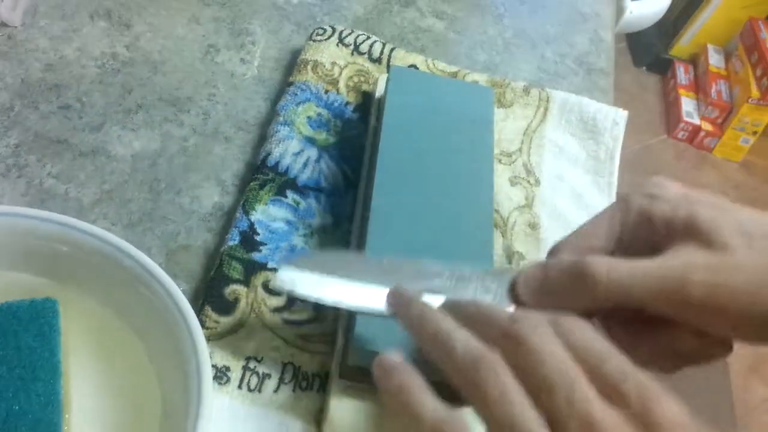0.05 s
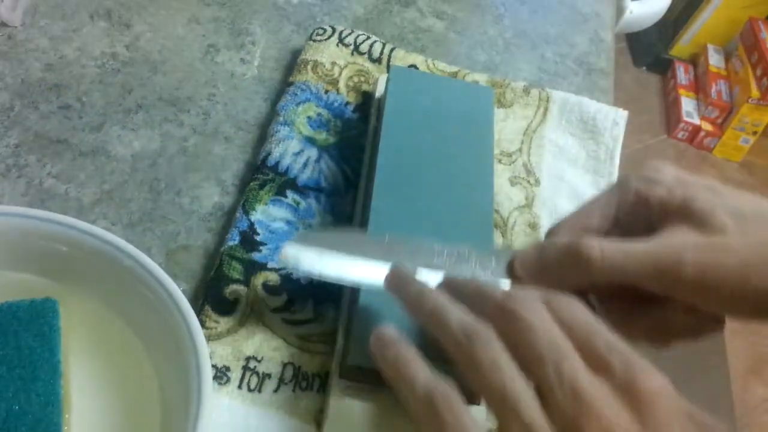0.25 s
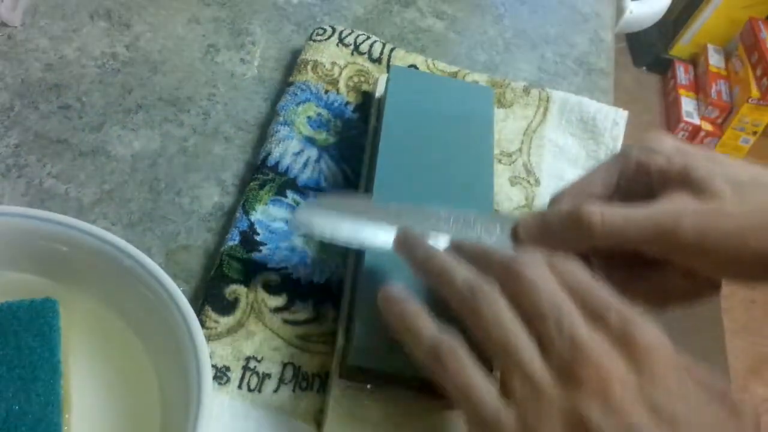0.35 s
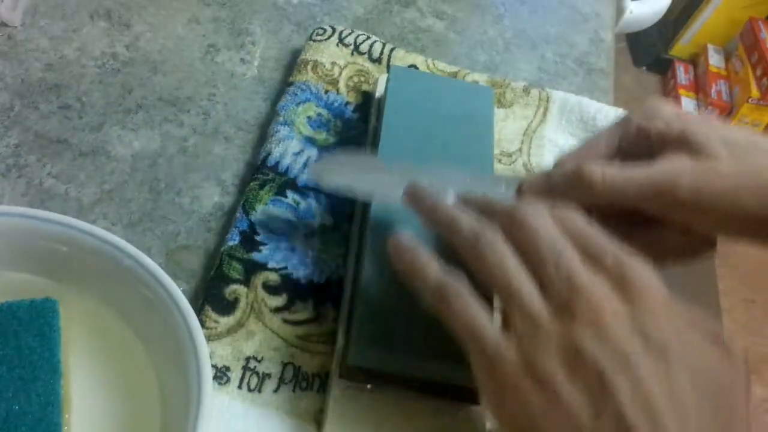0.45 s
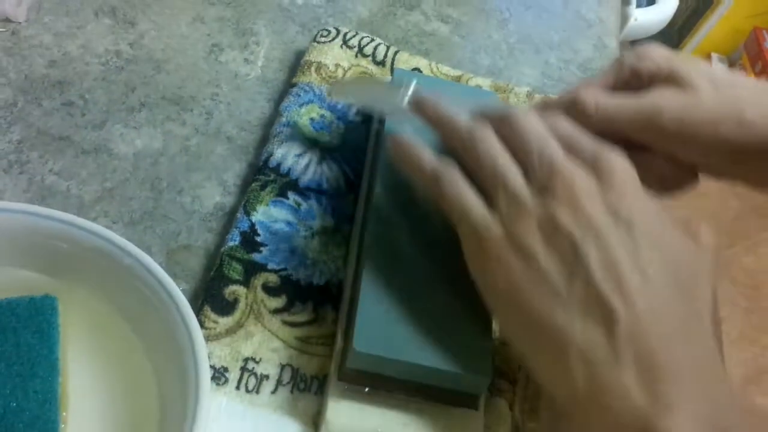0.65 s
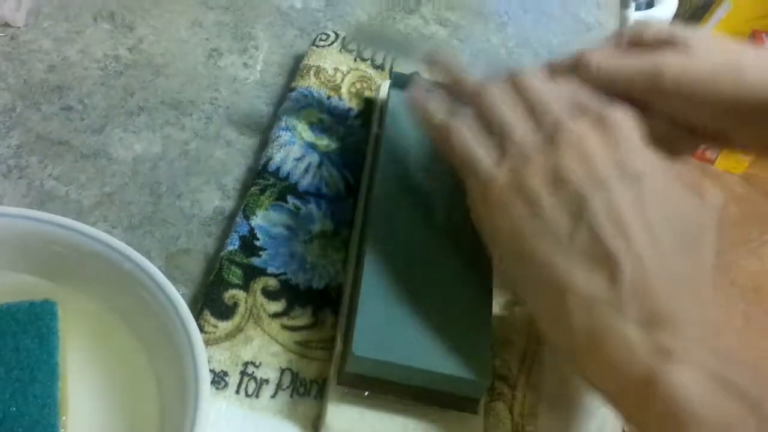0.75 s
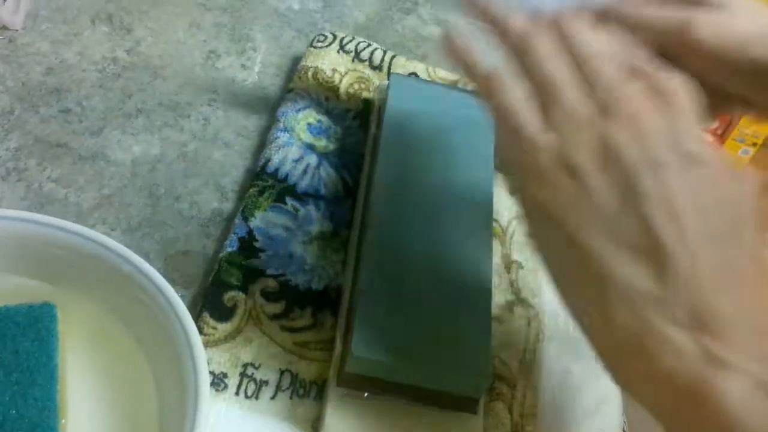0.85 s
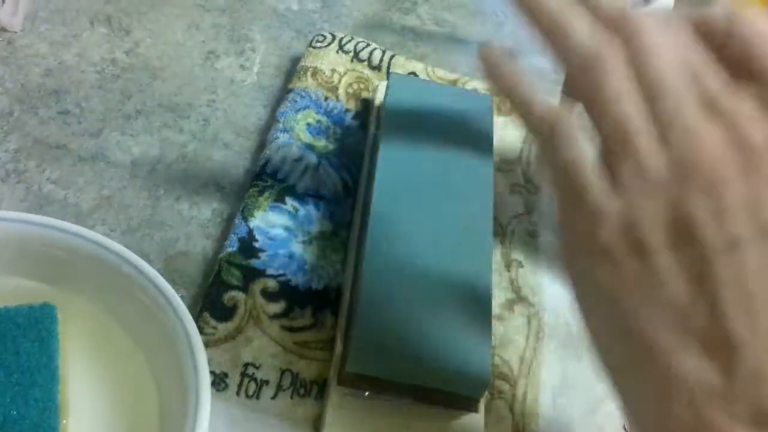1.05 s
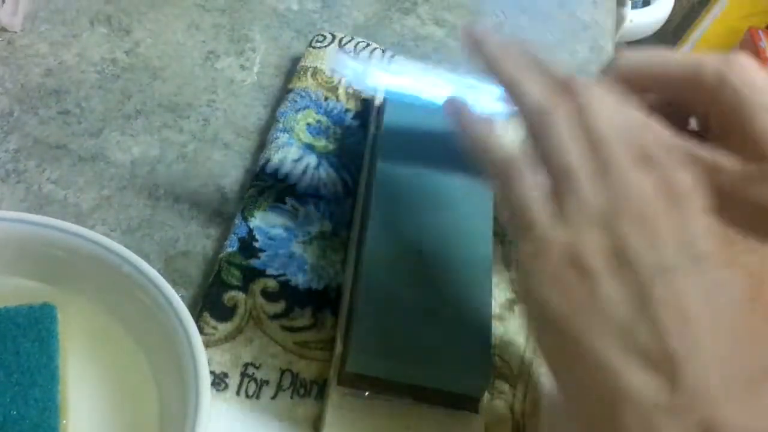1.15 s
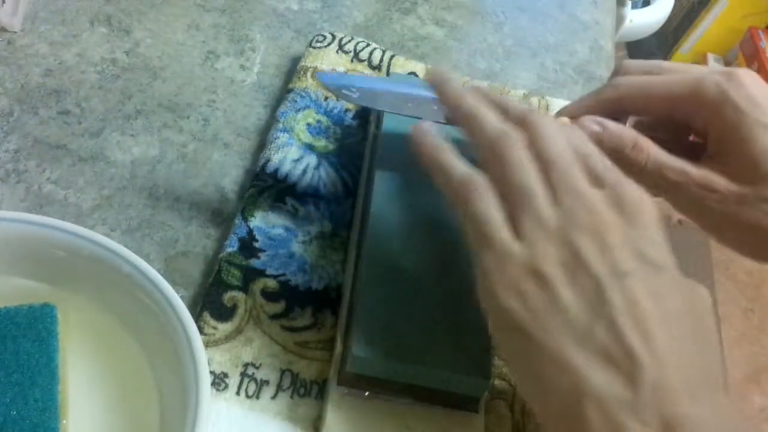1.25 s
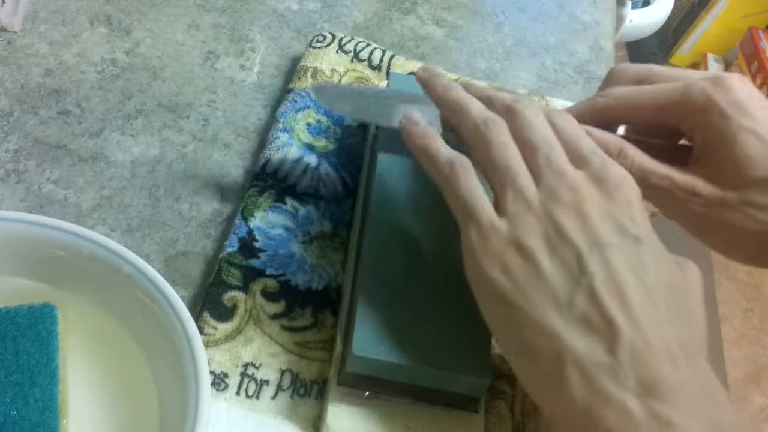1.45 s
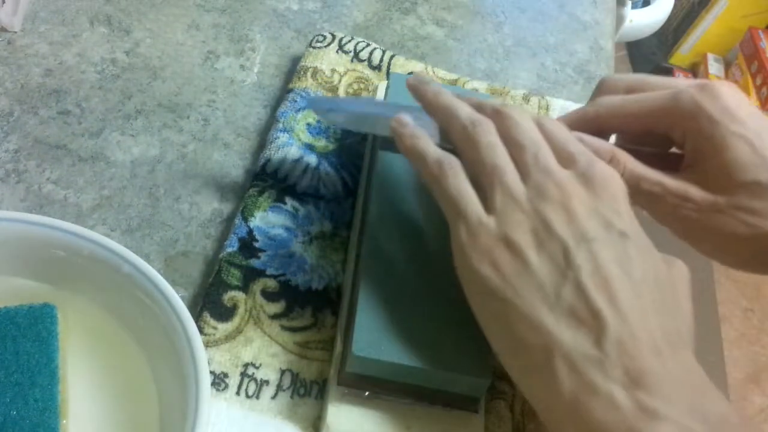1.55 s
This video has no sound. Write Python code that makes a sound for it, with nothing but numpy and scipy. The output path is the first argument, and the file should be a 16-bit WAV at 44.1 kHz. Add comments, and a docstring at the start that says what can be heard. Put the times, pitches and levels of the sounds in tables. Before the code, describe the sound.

A knife blade scrapes once across a coarse wet whetstone, close up in a quiet room

```python
"""A kitchen knife is drawn once across a coarse wet whetstone in a small quiet room, close to a two-port microphone.
Random grit catches, about 1900 a second over smooth slurry noise, excite resonances of blade and stone.
Coarse grains add single impulses, and decaying modes sound two knocks as the blade slips off the far edge.
The pushing hands set the counter rumbling (resonant noise); wavering sines make an appliance hum over a soft
room rumble of shaped noise. Decaying noise makes the near echoes and the room's reverberation."""
import sys
import numpy as np
from scipy import signal
from scipy.fft import rfft, irfft, next_fast_len
from scipy.io import wavfile
from scipy.ndimage import map_coordinates

SR = 44100
rng = np.random.default_rng(int(sys.argv[2]) if len(sys.argv) > 2 else 0)


def master(y):
    """Save y as 16-bit WAV."""
    cut = np.clip(np.atleast_2d(y).T, -1, 1)
    pcm = np.round(cut * 32767)  # scale
    wavfile.write(sys.argv[1], SR, pcm.astype(np.int16))


N = 70560  # samples


def amp(db):
    """Level to amplitude: 20 dB is a factor of ten."""
    return 10 ** (np.asarray(db) / 20)


def unit(x):
    """Normalise the mean-square power to 1."""
    return x / np.sqrt(np.mean(x ** 2) + 1e-20)


def along(points, hz):
    """Interpolate (f/Hz, value) points on a logarithmic frequency axis."""
    f, value = np.transpose(points)
    return np.interp(np.log(hz + 1), np.log(f + 1), value)


def wobble(rate):
    """Slow random fluctuation: a spline through normal random knots, rate of them a second."""
    knots = rng.standard_normal(int(N * rate / SR) + 4)
    return map_coordinates(knots, [np.arange(N) * rate / SR])


def filtered(x, response):
    """Linear filtering: multiply the spectrum by a complex response of frequency."""
    m = next_fast_len(N + SR // 2)
    spectrum = rfft(x, m) * response(np.fft.rfftfreq(m, 1 / SR))
    return irfft(spectrum, m)[..., :N]


def unit_power(h):
    """Normalise a frequency response to mean power 1."""
    return h / np.sqrt(np.mean(np.abs(h) ** 2))


def resonances(peaks):
    """Minimum-phase resonance: the folded cepstrum of the summed mode powers gives a causal response."""
    def response(f):
        power = 0
        for centre, width, db in peaks:
            resonator = f * width / (centre * centre - f * f + 1j * f * width)
            power = power + amp(db) ** 2 * np.abs(resonator) ** 4  # two stages: steep skirts
        cepstrum = irfft(np.log(power + 1e-12) / 2)
        half = len(cepstrum) // 2
        folded = np.concatenate([cepstrum[:1], 2 * cepstrum[1:half], np.zeros(len(cepstrum) - half)])
        return unit_power(np.exp(rfft(folded)))
    return response


def echoes(x, t60, seconds, part_s):
    """Diffuse reverberation: convolve cross-faded parts with fresh stereo noise, decaying at t60 by frequency."""
    step = round(part_s * SR)
    x = np.pad(x, (step, 2 * step))
    out = np.zeros((2, 2 * N))
    fade = np.sin(np.pi * np.arange(2 * step) / (2 * step)) ** 2
    for start in range(0, N + step, step):
        noise = rng.standard_normal((2, round(seconds * SR)))
        hz, t, bands = signal.stft(noise, SR, nperseg=128)
        decay = amp(-60 * t / along(t60, hz)[:, None])
        tail = signal.istft(bands * decay, SR, nperseg=128)[1]
        tail = tail / np.linalg.norm(tail, axis=1, keepdims=True)
        part = fade * x[start:start + 2 * step]
        wet = signal.fftconvolve(part[None], tail, axes=1)
        out[:, start:start + wet.shape[1]] += wet
    return out[:, step:step + N]


def room_rumble():
    """Partly coherent noise field: mid and side shares set the left-right correlation by frequency."""
    # rumble spectrum: f/Hz, relative power density/dB per Hz
    spectrum = [(20, -8.5), (60, -8), (120, -10.5), (180, -16.5), (240, -19), (350, -19.5), (700, -22),
                (1500, -32), (3000, -40.5), (6000, -45.5), (12400, -51), (13400, -71.5), (16000, -75.5)]
    # left-right likeness: f/Hz, correlation (1 is identical)
    likeness = [(60, 0.47), (240, 0.39), (950, 0.089), (3770, 0.07), (15000, 0.04)]

    def mid_side(hz):
        angle = np.arccos(np.clip(along(likeness, hz), -1, 1)) / 2
        return amp(along(spectrum, hz)) * [np.cos(angle), np.sin(angle)]

    mid, side = filtered(rng.standard_normal((2, N)), mid_side)
    return amp(-58) * unit(np.array([mid + side, mid - side]))


def appliance_hum():
    """Modulated sinusoids: random level and phase unsteadiness, with level and phase differences between ports."""
    # hum lines: f/Hz, rms level before wavering/dB, left over right/dB, left leads/rad
    lines = [(61.3, -67, -10.5, 1.3), (86.5, -60.5, 0.5, .7)]
    waver_db, drift_rad = 5.5, 0.2  # scale of the level and phase unsteadiness
    t = np.arange(N) / SR
    out = np.zeros((2, N))
    for hz, db, pan_db, lead in lines:
        start_phase = rng.uniform(0, 2 * np.pi)
        phase = 2 * np.pi * hz * t + drift_rad * wobble(5.3) + start_phase
        tone = np.sin(phase + np.array([[lead], [0]]))
        level = np.sqrt(2) * amp(db + waver_db * wobble(4.7))
        out += level * tone * amp([[pan_db / 2], [-pan_db / 2]])
    return out


def grit():
    """Stick-slip friction as random impulses over smooth rubbing, under uneven pressure; rms 1."""
    catches_per_s, spread_db = 1900, 3  # spread: mean of the exponential scatter in catch level
    slurry_db = -2  # smooth rubbing relative to the catches
    chatter_db, chatter_per_s = 0.5, 220  # fast unevenness
    sway_db, sway_per_s = -0.5, 30  # slow unevenness
    caught = rng.random(N) < catches_per_s / SR
    size = amp(spread_db * rng.exponential(size=N))
    catches = caught * size * rng.choice([-1, 1], N)
    rub = unit(catches) + amp(slurry_db) * rng.standard_normal(N)
    pressure_db = chatter_db * wobble(chatter_per_s) + sway_db * wobble(sway_per_s)
    return unit(rub * amp(pressure_db))


def scrape():
    """Source-filter excitation: grit noise and coarse-grain impulses drive the modes of stone and blade."""
    # course of the stroke: t/s, scrape level/dB, lowest blade ring over it/dB, treble over it/dB
    stroke = [(0.155, -58, -19, -6), (0.165, -45, -15, -3.5), (0.179, -39.5, -8, -6),
              (0.191, -51.5, -5, -0.5), (0.199, -40.5, -10, -1.5), (0.235, -30, -0.5, -6),
              (0.303, -27, -4.5, -5), (0.309, -25.5, 0.5, -5.5), (0.347, -30, -7, -5.5),
              (0.509, -32.5, -0.5, -4), (0.545, -29, -8, -3.5), (0.671, -40, 3.5, 3),
              (0.689, -33.5, -3.5, 0.5), (0.733, -35.5, -8, 3), (0.749, -42, -10, 6.5)]
    # how hard the scrape rings the stone's body: t/s, level/dB
    stone_level = [(0.16, -94), (0.166, -59), (0.228, -44), (0.242, -44.5), (0.278, -36), (0.29, -42.5),
                   (0.324, -34), (0.364, -51.5), (0.394, -42.5), (0.428, -51.5), (0.456, -46), (0.476, -51),
                   (0.554, -43), (0.688, -49), (0.708, -38.5), (0.722, -48.5), (0.736, -31), (0.745, -42)]
    # coarse grains: t/s, level before the drive gain/dB, lowest blade ring over the snag/dB
    snags = [(0.167, -35, 0.5), (0.176, -30, 2.5), (0.1984, -22.5, -4.5), (0.2164, -27, -4),
             (0.2524, -19.5, -5.5), (0.3039, -14.5, -10.5), (0.3115, -17.5, -8.5), (0.3144, -26, -5.5),
             (0.3226, -17.5, -9.5), (0.3467, -19, -4.5), (0.3532, -16.5, 1), (0.3894, -14.5, -2),
             (0.4018, -18, -2.5), (0.4094, -20.5, -10.5), (0.4464, -21, -4.5), (0.4533, -18, -7),
             (0.4734, -17, 0.5), (0.5, -18, -9), (0.5529, -26, -7), (0.5618, -20.5, -4.5), (0.7053, -20, 1),
             (0.7328, -27, 7)]
    # resonances, each: f/Hz, width of one resonator stage/Hz, relative level/dB
    stone_modes = [(800, 400, -23), (1280, 260, -6), (1480, 220, 0), (1900, 600, -15), (2750, 600, -15)]
    low_blade_modes = [(3740, 230, 0), (4000, 300, 0)]
    blade_modes = [(4710, 1100, -1.5), (4807, 330, -6.5), (5200, 1200, 2), (5560, 430, 3.5),
                   (5920, 160, 1.5)]
    treble_modes = [(7275, 1200, -5.5), (8130, 900, -8), (9270, 1000, -3), (10775, 2400, -1.5),
                    (11800, 1200, -9.5), (13900, 7100, -15)]
    touch_s, leave_s = 0.0032, 0.0041  # linear fade at first contact, decay constant at lift-off
    snag_drive_db = 11.5
    snag_stone_db, snag_treble_db = -16.5, -16.5  # shares of a snag

    t = np.arange(N) / SR
    s, *columns = np.transpose(stroke)
    level_db, low_db, treble_db = [np.interp(t, s, column) for column in columns]
    stone_db = np.interp(t, *np.transpose(stone_level)) - level_db  # relative to the scrape
    touch = np.clip((t - s[0]) / touch_s, 0, 1)
    lift_off = np.exp(-np.maximum(t - s[-1], 0) / leave_s)
    drive = grit() * touch * lift_off * amp(level_db)

    snag_s, snag_db, snag_low_db = np.transpose(snags)
    snag_at = np.round(snag_s * SR).astype(int)
    parts = [(stone_modes, stone_db, snag_stone_db), (low_blade_modes, low_db, snag_low_db),
             (blade_modes, 0, 0), (treble_modes, treble_db, snag_treble_db)]
    out = np.zeros(N)
    for modes, rub_db, share_db in parts:
        impulses = np.bincount(snag_at, amp(snag_db + snag_drive_db + share_db), N)
        out += filtered(drive * amp(rub_db) + impulses, resonances(modes))
    return out


def counter_rumble():
    """Forced resonance: noise from the pushing hands excites the counter under the stone."""
    # push of the hands: t/s, level/dB
    push = [(0.16, -90), (0.196, -62), (0.374, -63.5), (0.486, -74), (0.504, -58), (0.744, -62.5),
            (0.8, -96.5)]
    # counter resonances: f/Hz, width of one resonator stage/Hz, relative level/dB
    counter_modes = [(116, 50, -1.5), (155, 65, -0.5)]
    s, db = np.transpose(push)
    level = np.interp(np.arange(N) / SR, s, amp(db), left=0, right=0)
    return filtered(level * rng.standard_normal(N), resonances(counter_modes))


def slip_off():
    """Impact as free modal decay: the blade knocks the stone's edge as it leaves."""
    # knocks: t/s, level/dB
    knocks = [(.734, -43), (.741, -42)]
    # knock modes: f/Hz, relative level/dB, 60 dB decay time/s
    knock_modes = [(534, -3, 0.045), (827, 3, 0.035), (1125, 6.5, 0.051), (1404, -1, 0.063)]
    t = np.arange(SR // 8) / SR
    ring = np.zeros(len(t))
    for hz, level, t60 in knock_modes:
        ring += amp(level - 60 * t / t60) * np.sin(2 * np.pi * hz * t)
    ring *= 1 - np.exp(-t / 0.0015)  # soft onset
    out = np.zeros(N)
    for s, db in knocks:
        out[round(s * SR):][:len(t)] += amp(db) * ring
    return out


def at_microphone(rasp, knock):
    """Direct and diffuse fields: the direct sound leads in phase at the left port; echoes differ between ports."""
    # phase lead of the left port: f/Hz, lead/rad
    left_leads = [(0, 0), (1030, 1.4), (1500, 2.3), (1900, 3.0), (2900, 3.2), (4000, 4.0), (5860, 6.3),
                  (6550, 7.4), (7900, 12.4), (10400, 18.9), (11400, 20.3), (13000, 25.2)]
    # counter-top echoes over the direct sound: f/Hz, level/dB
    scatter = [(800, -13.5), (1500, -10.5), (2800, 0.5), (3500, 10.5), (4500, -15.5), (6000, -2), (7200, 2),
               (15000, 2)]
    # room reverberation: f/Hz, 60 dB decay time/s
    room_t60 = [(500, 0.49), (1500, 0.17), (2600, 0.14), (4000, .36), (12000, 0.27)]
    scatter_t60, room_db = 0.016, -7.5  # s, dB
    f, lead = np.transpose(left_leads)

    def ports(hz):
        return np.exp(.5j * np.outer([1, -1], np.interp(hz, f, lead)))

    def direct_share(hz):  # direct and scattered powers add to one
        return 1 / np.sqrt(1 + amp(along(scatter, hz)) ** 2)

    def scattered_share(hz):
        return direct_share(hz) * amp(along(scatter, hz))

    direct = filtered(rasp, lambda hz: direct_share(hz) * ports(hz)) + filtered(knock, ports)
    near = filtered(echoes(rasp, [(1000, scatter_t60)], .06, part_s=.04), scattered_share)
    room = amp(room_db) * echoes(rasp + knock, room_t60, .5, part_s=.1)
    return direct + near + room


def scene():
    """Superposition: the stroke at the two ports, the counter and the steady background add linearly."""
    background = room_rumble() + appliance_hum()
    stroke_sound = at_microphone(scrape(), slip_off())
    return background + stroke_sound + counter_rumble()


def record(dry):
    """Band limiting: the recorder keeps nothing from 15850 Hz up."""
    return filtered(dry, lambda hz: hz < 15850)


dry = scene()
out = record(dry)
master(out)
```